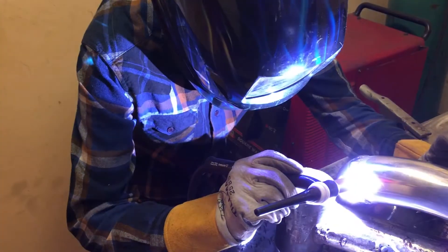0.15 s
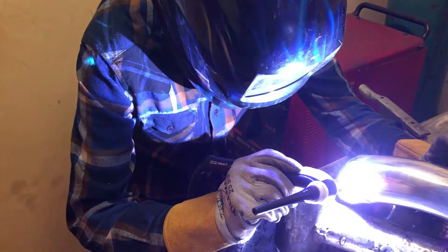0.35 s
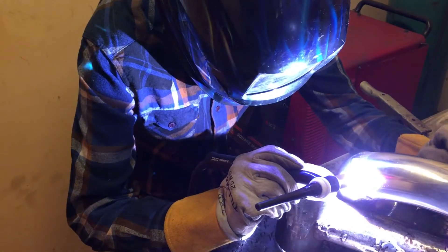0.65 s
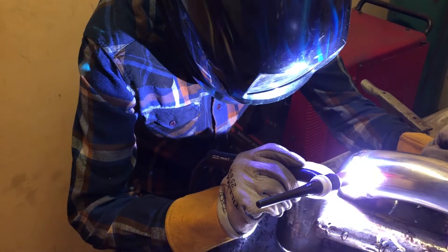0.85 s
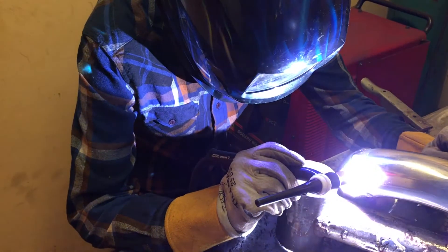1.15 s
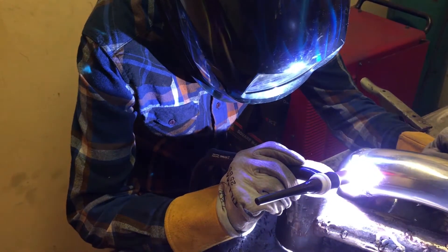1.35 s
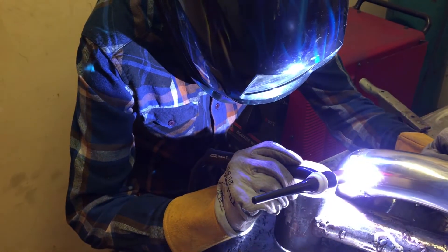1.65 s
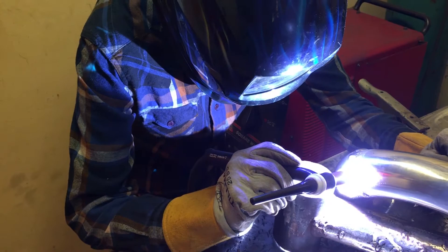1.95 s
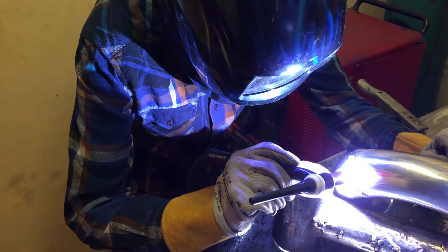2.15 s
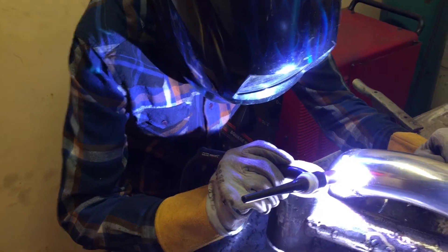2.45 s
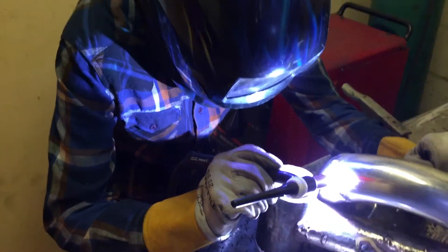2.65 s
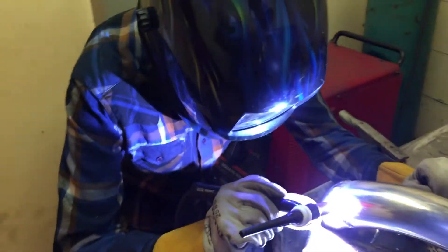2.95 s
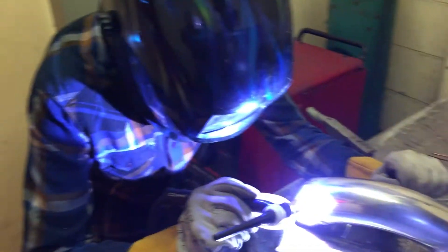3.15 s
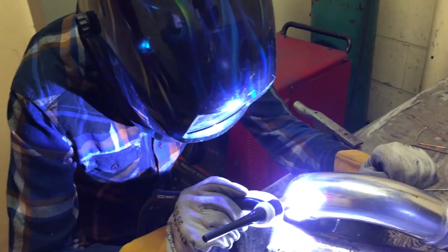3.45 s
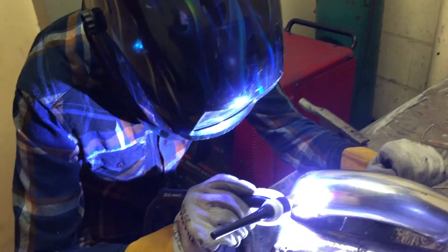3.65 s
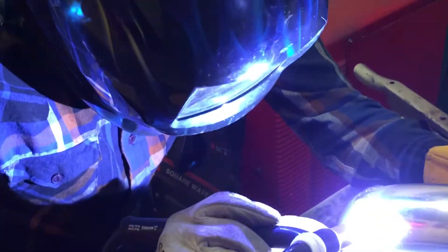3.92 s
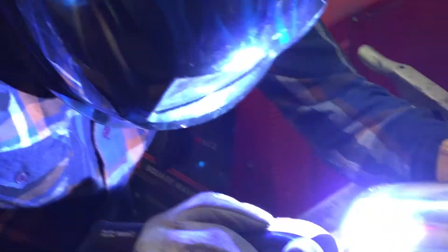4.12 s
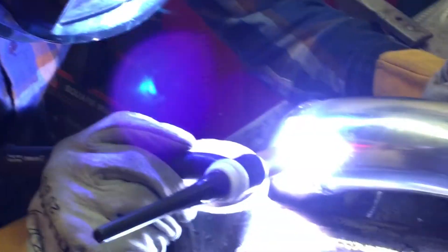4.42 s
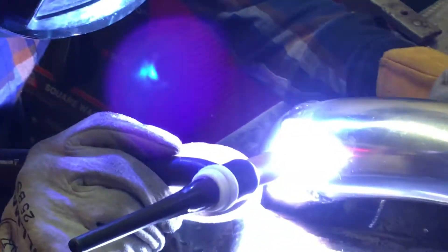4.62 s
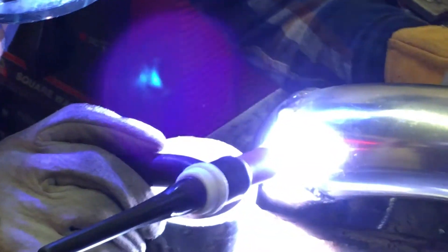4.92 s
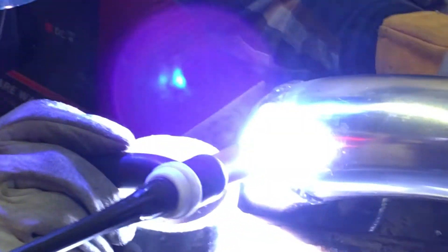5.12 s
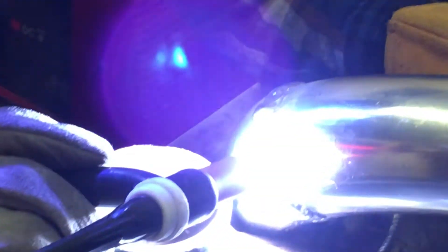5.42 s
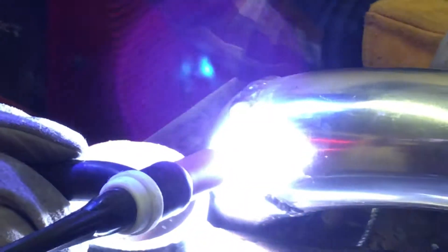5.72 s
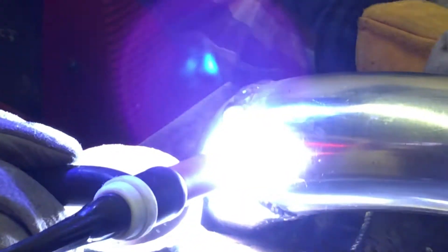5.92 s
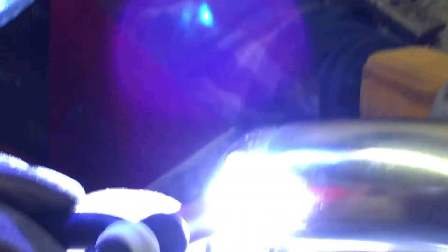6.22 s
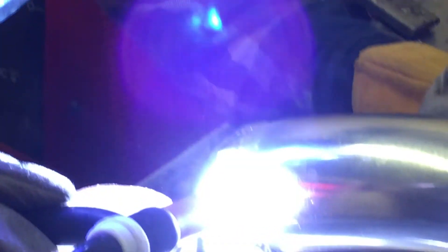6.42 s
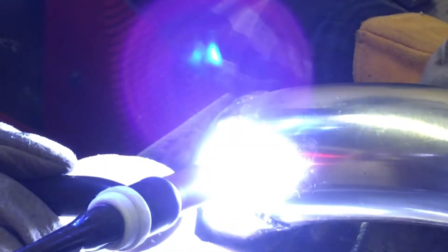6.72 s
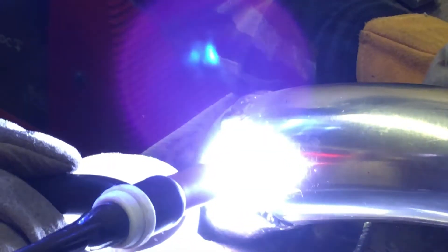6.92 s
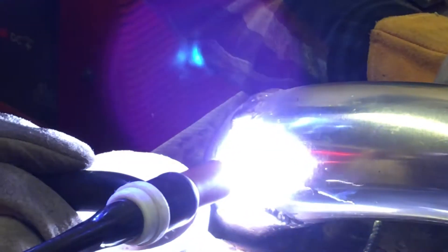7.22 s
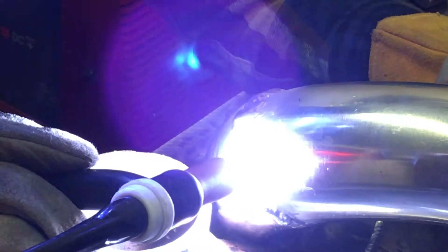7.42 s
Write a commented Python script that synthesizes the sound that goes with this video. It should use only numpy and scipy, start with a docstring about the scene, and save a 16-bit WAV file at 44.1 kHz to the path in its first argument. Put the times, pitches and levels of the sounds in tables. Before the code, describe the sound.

A loud, harsh, steady welding arc buzz of rapid sharp cracks in a workshop, turning rougher and more sputtering near the end, over faint hum and fan rumble.

```python
"""In a workshop, about a metre from an alternating-current welding arc on a metal pipe.
The arc re-strikes with a sharp crack at both current reversals of every mains cycle; late on it turns restless.
Pipe, bench and smaller parts return discrete echoes, near clutter and walls a noise-like tail.
The transformer hums as mains multiples; gas and fan are coloured noise, the fan with wavering tones.
Now and then the buzz blurs for a moment into thin ringing stripes of treble."""
import sys
import numpy as np
from scipy import signal
from scipy.fft import rfft, irfft
from scipy.io import wavfile
from scipy.ndimage import uniform_filter1d

SR = 44100
rng = np.random.default_rng(int(sys.argv[2]) if len(sys.argv) > 2 else 0)


def bounce(signal):
    """Save signal as a 16-bit WAV file at the path given by the first command-line argument."""
    frames = np.transpose(np.atleast_2d(signal))
    limited = np.clip(frames, -1, 1)
    pcm = np.round(limited * 32767).astype(np.int16)
    wavfile.write(sys.argv[1], SR, pcm)


N = 333837

MAINS_HZ, FIRST_MS = 60.0084, 2.32   # nominal first crack, after the cycle starts
RESTLESS_S = (5.8, 6.6)   # arc turns restless between these times
WAVER_S = .07   # time between turns of the slow random wavers


def from_db(db):
    """Amplitude factor of a level in dB."""
    return 10 ** (np.asarray(db) / 20)


def rms_one(x):
    """Scales a signal to rms 1."""
    return x / np.sqrt(np.mean(x ** 2) + 1e-20)


def at_times(rows, t):
    """Interpolates the columns of a table whose first column is time."""
    s, *columns = np.transpose(rows)
    return [np.interp(t, s, column) for column in columns]


def waver(t):
    """Slow random curve: straight lines between normal draws of spread 1."""
    turns = np.arange(0, N / SR + WAVER_S, WAVER_S)
    return np.interp(t, turns, rng.standard_normal(len(turns)))


def coloured(x, spectrum):
    """Filters by a spectrum of (hz, db), interpolated over log frequency."""
    hz, db = np.transpose(spectrum)
    bins_hz = np.maximum(np.fft.rfftfreq(len(x), 1 / SR), 1)
    gain_db = np.interp(np.log(bins_hz), np.log(hz), db)
    return irfft(rfft(x) * from_db(gain_db), len(x))


def resonance(x, hz, width_hz):
    """Two-pole band-pass with gain 1 on top."""
    r = np.exp(-np.pi * width_hz / SR)
    zeros = np.array([1, 0, -1]) * (1 - r * r) / 2
    poles = [1, -2 * r * np.cos(2 * np.pi * hz / SR), r * r]
    return signal.lfilter(zeros, poles, x)


# nominal crack peaks before scatter and high-pass: start_s, first_db, second_db
CRACKS = [(0, -5, -7), (.25, -4.5, -10), (.42, -4, -3.5), (1.8, -3.5, -6), (2.3, -4.5, -7.5),
          (3.1, -4.6, -9.5), (3.7, -2.5, -7), (4.1, -2.5, -4.5), (4.8, -3, -7), (5.3, -3.5, -6.5),
          (6.3, -2.6, -6), (7.1, -2.5, -4), (7.2, -4, -8), (7.57, -2, -8)]
# weaker reflections off cup, glove and clamps, before stance: lag_ms, signed_share
WEAK_ECHOES = [(0.4, -.15), (0.524, .2), (.88, 0.086), (.965, -0.11), (1.132, -0.09), (1.389, 0.092),
               (1.72, 0.23), (1.9, 0.088), (2.77, 0.017)]
# torch and listener shift: start_s, lag_stretch (factor), pipe_db, weak_gain_db
STANCE = [(0, 1.0, -13, -5), (1.5, .99, -12.5, -4), (2.3, .972, -11.5, -4), (3, .965, -10, -2),
          (3.6, 1.01, -11, 0), (4.2, 1.028, -13, 0), (5.7, .998, -7.5, -1), (6.4, 1.01, -7, -4),
          (7.6, 1.012, -6, -4)]
PIPE_MS, BENCH_MS, BENCH_DB = .254, .626, -6.5
# (at the start, settled); the second crack comes sooner and both grow broader
SETTLE_S, GAP_MS, WIDTH_MS = 1.2, (7.58, 7.34), (.019, .029)
SCATTER_MS, HURRY_MS = (.016, .045), .07   # (calm, restless); restless second crack sooner still
SECOND_SCATTER = .55   # factor on restlessness for the second crack's scatter
CRACK_SPREAD_DB, WAVER_DB = 1.2, .6
# rebound shares: first crack grows steadily, second keeps its mean
REBOUND_START, REBOUND_PER_S, REBOUND_SECOND = .25, 0.11, .1
DIP = (-0.084, 0.27)   # extra depth of leading dip, first and second crack
SPIT_DB, SPIT_LATE_MS = 1, 0.121   # lift per unit share; delay of late strike
SPUTTER_REST = 0.09   # mean share of the first crack's late strike between spits, once restless
ARC_LOW_HZ = 1183


def arc():
    """Two cracks a cycle and, in a second row, near echoes; so small a source radiates little bass."""
    start = np.arange(int(N / SR * MAINS_HZ)) / MAINS_HZ
    settled = 1 - np.exp(-start / SETTLE_S)
    restless = np.interp(start, RESTLESS_S, [0, 1])
    gap_ms = np.interp(settled, [0, 1], GAP_MS) - HURRY_MS * restless
    width_ms = np.interp(settled, [0, 1], WIDTH_MS)
    peak_db, spit = at_times(CRACKS, start), spits(start)
    stretch, pipe_db, weak_db = at_times(STANCE, start)
    paths = [(0, 1), (PIPE_MS, from_db(pipe_db)), (BENCH_MS, from_db(BENCH_DB))]
    paths += [(lag_ms, share * from_db(weak_db)) for lag_ms, share in WEAK_ECHOES]
    strength_db = WAVER_DB * waver(start)
    rebounds = [REBOUND_START + REBOUND_PER_S * start, np.full(len(start), REBOUND_SECOND)]
    out = np.zeros((2, N))
    for k, rebound in enumerate(rebounds):
        luck, chance = rng.standard_normal((len(start), 4)), rng.random((len(start), 2))
        scatter_ms = np.interp(restless * SECOND_SCATTER ** k, [0, 1], SCATTER_MS)
        at_s = start + (FIRST_MS + k * gap_ms + scatter_ms * luck[:, 0]) / 1000
        spread_db = np.where(spit > 0, SPIT_DB * spit, CRACK_SPREAD_DB * luck[:, 1])
        height = from_db(peak_db[k] + strength_db + spread_db)
        width = width_ms * (1 + .03 * luck[:, 2])
        rebound = rebound * (1 + .15 * luck[:, 3])
        # a wandering arc catches twice: a broader strike follows
        late_s = np.where(spit > 0, SPIT_LATE_MS, .05 + .25 * chance[:, 0]) / 1000
        sputter = 2 * SPUTTER_REST * restless * chance[:, 1]
        late = np.maximum(sputter, spit) * (1 - .6 * k)
        for lag_ms, share in paths:
            row = out[int(lag_ms > 0)]
            heard_s = at_s + stretch * lag_ms / 1000
            add_crack(row, heard_s, height * share * (1 - 1.5 * late), width, rebound, DIP[k])
            add_crack(row, heard_s + late_s, height * share * late, 1.235 * width, 4.03 * rebound, DIP[k])
    high_pass = signal.butter(2, ARC_LOW_HZ, "high", fs=SR, output="sos")
    return signal.sosfilt(high_pass, out)


# hard spits, where the arc catches twice: start_s, late_share (of first crack)
SPITS = [(5.851, 0.12), (5.985, 0.1), (6.118, 0.39), (6.151, 0.23), (6.235, 0.24), (6.385, 0.4),
         (6.435, 0.34), (6.501, 0.15), (6.585, 0.26), (6.601, 0.27), (6.618, 0.33), (6.651, 0.4),
         (6.701, 0.32), (6.935, 0.34), (6.985, 0.25), (7.018, .28), (7.035, 0.37), (7.051, 0.15),
         (7.068, 0.16), (7.085, 0.29), (7.101, 0.33), (7.118, 0.21), (7.135, .35), (7.251, 0.16),
         (7.301, 0.33), (7.318, 0.29), (7.368, 0.21), (7.451, 0.17)]


def spits(start):
    """Late-strike share per mains cycle: each spit falls on its nearest cycle."""
    share = np.zeros(len(start))
    for s, late in SPITS:
        share[np.argmin(np.abs(start + FIRST_MS / 1000 - s))] = late
    return share


LEAD = 0.18   # share of the small swell ahead of the dip


def add_crack(out, at_s, height, width_ms, rebound, dip):
    """Adds pressure steps between samples: swell, dip, peak and slower rebound."""
    index = np.round(at_s * SR).astype(int)[:, None] + np.arange(-10, 20)
    u = (index / SR - at_s[:, None]) * 1000 / width_ms[:, None]
    shape = np.sqrt(np.e) * u * np.exp(-u * u / 2)   # dip at -1, peak at +1
    shape -= rebound[:, None] * np.exp(-((u - 3.2) / 0.87) ** 2)
    shape -= dip * np.exp(-(u + 1) ** 2)
    shape += LEAD * np.exp(-((u + 3.16) / 0.81) ** 2)
    np.add.at(out, np.clip(index, 0, len(out) - 1), height[:, None] * shape)


# steady hum: mains_multiple, level_db (rms)
HUM = [(1, -60), (2, -26.5), (3, -43.5), (4, -49), (5, -46.5), (6, -49), (7, -57), (8, -48.5), (9, -46),
       (10, -54), (11, -53.5), (20, -61)]
# buzz before rise and waver: mains_multiple, level_db (rms)
BUZZ = [(16, -55), (18, -60)]
BUZZ_RISE_DB, BUZZ_WAVER_DB = 7.5, 3   # rise as the arc turns restless; random spread


def transformer():
    """Mains multiples locked to the arc: nominal first cracks meet troughs of the second multiple."""
    t = np.arange(N) / SR
    turn = 2 * np.pi * MAINS_HZ * (t - FIRST_MS / 1000)
    rise_db = np.interp(t, (RESTLESS_S[0] - .2, RESTLESS_S[0] + .2), [0, BUZZ_RISE_DB])
    tones = HUM + [(k, db + rise_db + BUZZ_WAVER_DB * waver(t)) for k, db in BUZZ]
    # k * (k - 2): fixed phase offset in radians
    return -sum(np.sqrt(2) * from_db(db) * np.cos(k * turn + k * (k - 2)) for k, db in tones)


# hiss colour, before rms scaling: freq_hz, relative_db (per Hz)
HISS = [(700, -5), (1500, -15), (2500, 4.5), (3500, 1), (5500, 5), (8000, -3.5), (12000, -4.5)]
HISS_DB, HISS_SWING_DB, HISS_TOP_MS = -35.5, 3, 4.8   # mean; peak swing; loudest this long into cycle


def gas():
    """Shielding gas and plasma hiss, following the first cracks' level and swinging each cycle."""
    t = np.arange(N) / SR
    level_db = at_times(CRACKS, t)[0]
    swing_db = HISS_SWING_DB * np.cos(2 * np.pi * MAINS_HZ * (t - HISS_TOP_MS / 1000))
    gain = from_db(HISS_DB + level_db - level_db.mean() + swing_db)
    return gain * rms_one(coloured(rng.standard_normal(N), HISS))


# rumble colour, before rms scaling: freq_hz, relative_db (per Hz)
FAN = [(15, -62), (25, -37), (64, -26), (89, -25.5), (119, -15), (143, -32.5), (167, -14.5), (216, -25.5),
       (300, -15.5), (430, -25), (537, -24.5), (769, -30.5), (1500, -28.5), (1950, -41), (3300, -120)]
# fan tones: pitch_hz, width_hz (each of two passes), level_db (rms)
FAN_TONES = [(74.3, 13, -46.5), (135, 5.9, -40), (294.8, 8, -47.5), (224.9, 5, -48)]
FAN_DB = -36   # rumble rms


def fan():
    """Low broadband rumble plus wavering tones of doubly resonated noise."""
    out = from_db(FAN_DB) * rms_one(coloured(rng.standard_normal(N), FAN))
    for hz, width_hz, db in FAN_TONES:
        tone = resonance(rng.standard_normal(N), hz, width_hz)
        out += from_db(db) * rms_one(resonance(tone, hz, width_hz))
    return out


# near clutter and far walls: t60_s, level_db (tail energy before wall colour)
SHOP = [(0.028, -9.5), (.35, -12)]
# reflection colour: freq_hz, gain_db
WALLS = [(500, -45), (900, 10.5), (1500, 6), (2300, 8.5), (3500, 5), (5500, 3), (8000, 5), (10300, 3),
         (13000, -7.5)]


def workshop(x, count=8):
    """Dense reflections by decaying noise; as the listener shifts, one pattern fades into the next."""
    t, out = np.arange(SR // 2) / SR, np.zeros(N)
    place = np.arange(N) / N * (count - 1)
    for k in range(count):
        tail = np.zeros(len(t))
        for t60, db in SHOP:
            unit_energy = np.sqrt(2 * np.log(1000) / t60 / SR)
            tail += from_db(db - 60 * t / t60) * unit_energy * rng.standard_normal(len(t))
        tail = coloured(tail, WALLS) * np.clip(t / 0.0018, 0, 1)
        fade = np.cos(np.pi / 2 * np.clip(place - k, -1, 1))
        heard = np.flatnonzero(np.abs(place - k) < 1)
        echo = signal.fftconvolve((x * fade)[heard], tail)[:N - heard[0]]
        out[heard[0]:heard[0] + len(echo)] += echo
    return out


# moments of blurred buzz: centre_s, length_s
BLURS = [(.118, .025), (.7, .03), (.74, .022), (1.155, .045), (1.298, .028), (1.34, .022), (1.722, .022),
         (2.021, .028), (2.487, .03), (3.276, .03), (3.406, .032), (3.661, .025), (3.852, .026),
         (4.537, .02), (4.622, .022), (4.941, .026), (5.411, .024), (5.453, .026), (5.776, .022),
         (5.829, .045), (5.945, .027), (6.031, .024), (6.221, .022), (6.285, .024), (6.329, .03),
         (6.565, .03), (6.691, .024), (7.172, .05), (7.483, .03), (7.524, .034)]
BLUR_LOW_HZ, BLUR_EDGE_S, BLUR_DB = 380, .012, -1   # level against the treble replaced
SMEAR_RAD = .9   # rms phase slip of the stripes, dulling the cracks
STRIPE_HZ, SURROUNDINGS_HZ = 40, 3500   # averaging widths
STRIPE_CHANCE_DB, STAND_OUT_DB, SINK_DB = 3.5, 3.5, -30


def blur(x):
    """Where the spectrum stands out, give or take chance, thin treble stripes ring; the rest sinks."""
    high_pass = signal.butter(4, BLUR_LOW_HZ, "high", fs=SR, output="sos")
    high = signal.sosfiltfilt(high_pass, x)
    out, size = x.copy(), 4096
    t, bin_hz = (np.arange(size) - size // 2) / SR, SR / size
    for s, length_s in BLURS:
        part = slice(int(s * SR) - size // 2, int(s * SR) + size // 2)
        piece = high[part]
        fade = np.clip((length_s / 2 - np.abs(t[:len(piece)])) / BLUR_EDGE_S + .5, 0, 1)
        spectrum = rfft(piece * np.hanning(size)[:len(piece)], size)
        power = np.abs(spectrum) ** 2 + 1e-12
        near = uniform_filter1d(power, int(STRIPE_HZ / bin_hz))
        around = uniform_filter1d(power, int(SURROUNDINGS_HZ / bin_hz))
        chance = rms_one(uniform_filter1d(rng.standard_normal(len(power)), int(STRIPE_HZ / bin_hz)))
        rings = 10 * np.log10(near / around) + STRIPE_CHANCE_DB * chance > STAND_OUT_DB
        gain = np.where(rings, 1, from_db(SINK_DB))
        slip = np.exp(1j * SMEAR_RAD * chance[::-1])
        blurred = irfft(spectrum * gain * slip, size)[:len(piece)]
        match = np.sqrt(np.sum(fade * piece ** 2) / np.sum(fade * blurred ** 2))
        blurred *= from_db(BLUR_DB) * match
        out[part] += np.sin(np.pi / 2 * fade) * blurred - (1 - np.cos(np.pi / 2 * fade)) * piece
    return out


def scene():
    """Sums arc, echoes, machines and room, then blurs the sum."""
    bare, echoes = arc()
    # the walls hear the near echoes at other lags, so less of their colour
    room = workshop(bare + 0.034 * echoes)
    return blur(bare + echoes + room + transformer() + gas() + fan())[None]


# microphone resonances in series: centre_hz, width_hz, lift_db
MIC = [(1632, 560, 7), (3540, 370, 4), (8900, 6200, 0), (11800, 950, 4.5)]
TREBLE_END_HZ, CUTOFF_HZ = 14800, 15800   # stop-band edges
KNEE, CEILING = .7, .9   # upward peaks bend over softly between these heights
OVERLOAD, SQUEEZE = .98, .012   # clipping height; cubic rounding below it


def record(dry):
    """Small microphone: lifts, soft upward peaks, treble fall, overload clipping, steep cut."""
    for hz, width_hz, db in MIC:
        dry = dry + (from_db(db) - 1) * resonance(dry, hz, width_hz)
    bent = KNEE + (CEILING - KNEE) * np.tanh((dry - KNEE) / (CEILING - KNEE))
    dry = np.where(dry > KNEE, bent, dry)
    dry = signal.sosfiltfilt(signal.butter(7, 12300, fs=SR, output="sos"), dry)
    dry = signal.sosfiltfilt(signal.cheby2(8, 30, TREBLE_END_HZ, fs=SR, output="sos"), dry)
    dry = np.clip(dry - SQUEEZE * dry ** 3, -OVERLOAD, OVERLOAD)
    # clipping products above the treble fall survive up to this cut
    return signal.sosfiltfilt(signal.cheby2(12, 30, CUTOFF_HZ, fs=SR, output="sos"), dry)


dry = scene()
out = record(dry)
bounce(out)
```